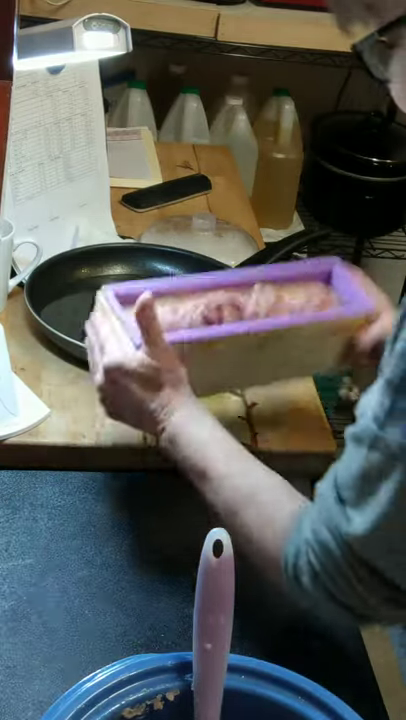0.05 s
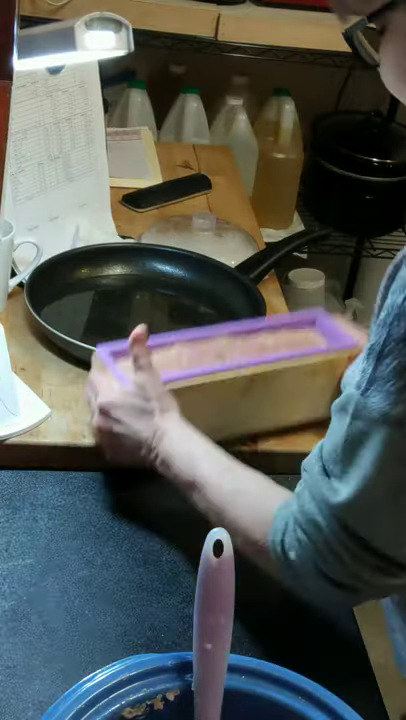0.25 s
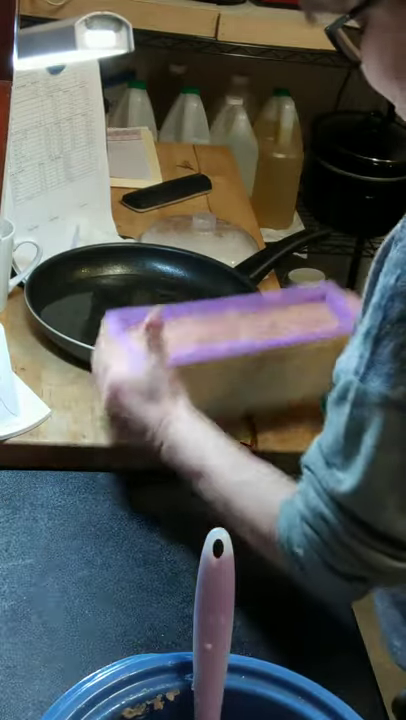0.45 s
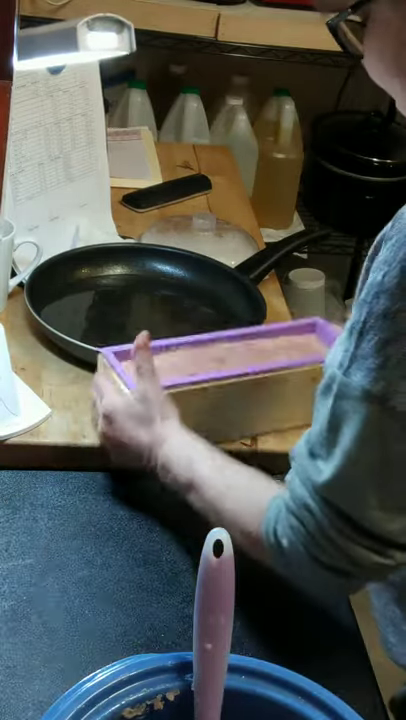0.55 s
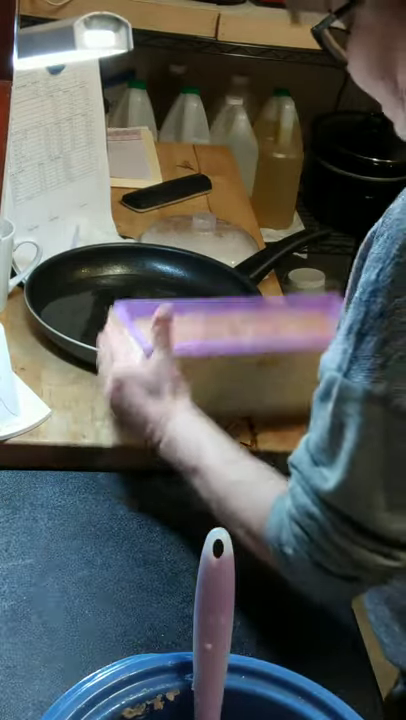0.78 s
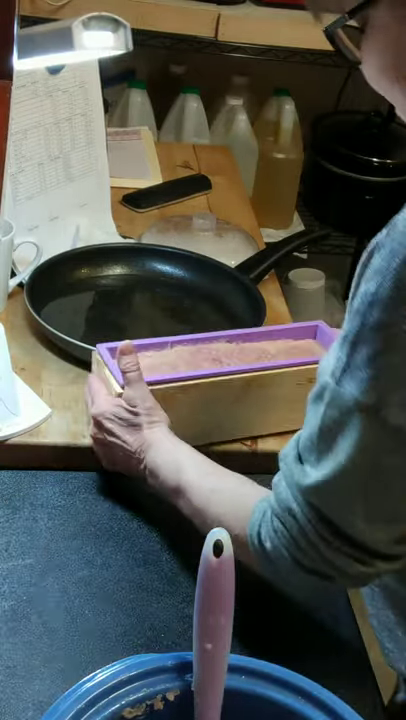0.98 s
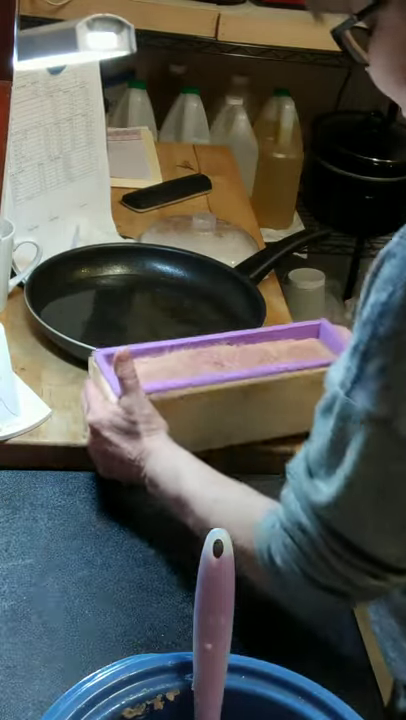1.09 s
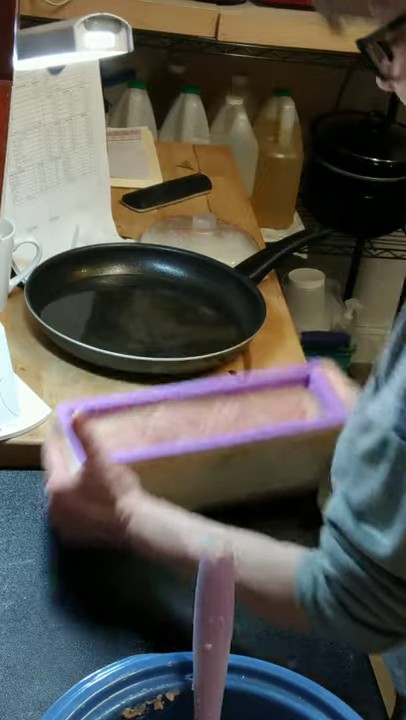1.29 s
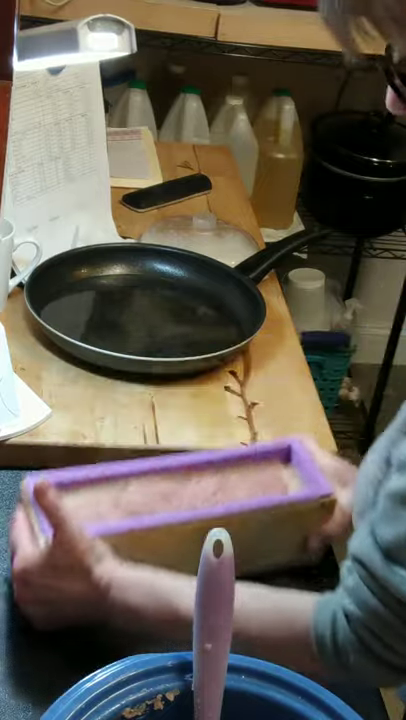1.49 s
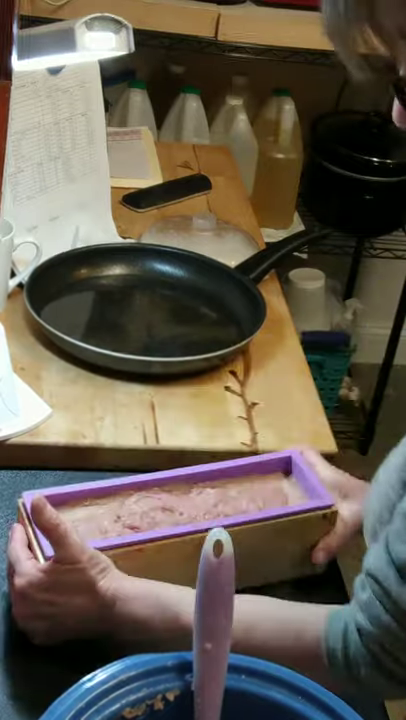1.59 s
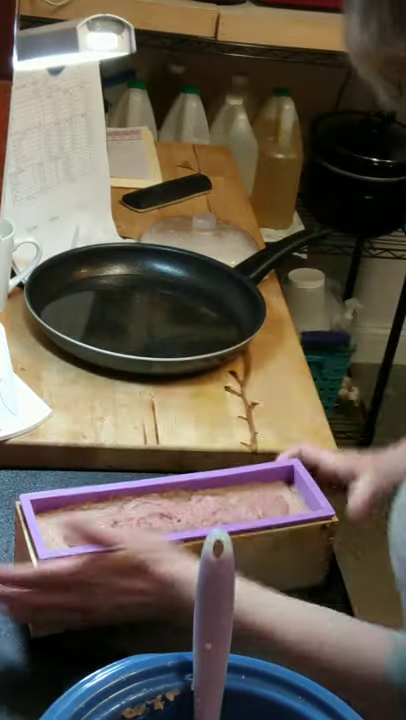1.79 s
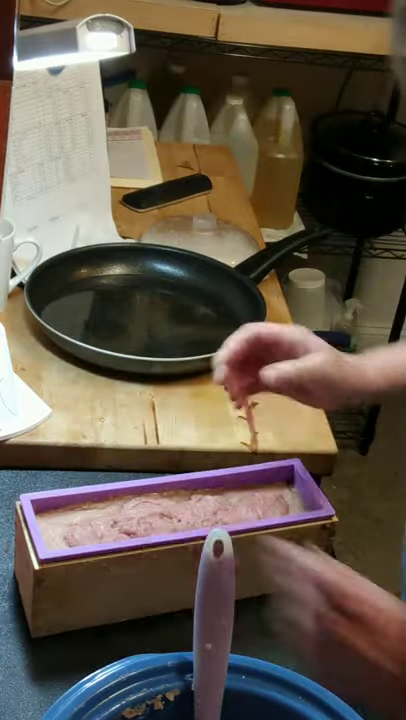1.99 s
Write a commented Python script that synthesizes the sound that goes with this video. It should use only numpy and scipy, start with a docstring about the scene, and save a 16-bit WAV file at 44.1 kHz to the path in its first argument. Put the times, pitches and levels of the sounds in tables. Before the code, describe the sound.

Heavy wooden loaf mold, damped by batter, bangs on a wooden table at about 0.25, 0.6 and 0.93 s. The first is strongest; each is a tight cluster of cracks and hollow knocks with low boom, short room tail and faint pan rattle. Around 1.62-1.8 s it lands softly on a counter with dull thuds and scuffs, then tiny release clicks near 1.87 s. Quiet hum and hiss throughout.

```python
"""Loaf mold banged on a table

In a small room, over a quiet hum and hiss, a wooden loaf mold full of batter is banged three times on a wooden
table, one edge first, then the rest of its base: decaying modes for box, board and table top, noise for cracks.
Low noise makes the table sway and boom; a pan on it hops and rings; a treble sizzle lingers after the blows.
The mold is then set down softly on a counter, with thuds, scuffs and clicks, and let go.
One microphone takes it all, the same in both channels."""
import sys
import numpy as np
from scipy import signal
from scipy.fft import rfft, irfft, next_fast_len
from scipy.io import wavfile
from scipy.ndimage import uniform_filter1d

SR = 44100
rng = np.random.default_rng(int(sys.argv[2]) if len(sys.argv) > 2 else 0)


def to_linear_factor(level_db):
    """Convert decibel levels (scalar or array-like) to linear amplitude factors."""
    exponent = np.asarray(level_db, float) / 20
    return 10 ** exponent


def generate_wav(sig):
    """Save sig (samples, or channels by samples) to the path in sys.argv[1] as 16-bit PCM at SR."""
    pcm = np.round(np.clip(np.atleast_2d(sig).T, -1, 1) * 32767).astype(np.int16)
    wavfile.write(sys.argv[1], SR, pcm)


N = 90404  # samples
KNOCK_RISE_S, THUD_RISE_S, PAN_RISE_S = 0.00037, 0.001, 0.00067
SWAY_RISE_S, SCUFF_RISE_S, LANDING_RISE_S = 0.03, 0.004, 0.003
WOOD_BLUR_HZ, PAN_BLUR_HZ, CLICK_BLUR_HZ = 24, 150, 200  # line widths from drifting phase


def unit(x):
    """Scales a signal to an rms of one."""
    return x / np.sqrt(np.mean(x ** 2) + 1e-20)


def along(points, hz):
    """Reads a curve of (Hz, value) points on a log frequency axis."""
    point_hz, value = np.transpose(points)
    return np.interp(np.log(hz + 1), np.log(point_hz + 1), value)


def filtered(x, response):
    """Multiplies the spectrum of x by a response of frequency."""
    size = next_fast_len(len(x) + 8192)
    hz = np.fft.rfftfreq(size, 1 / SR)
    return irfft(rfft(x, size) * response(hz), size)[:len(x)]


def add(track, start_s, sound):
    """Mixes a sound into the track at a time."""
    part = track[round(start_s * SR):][:len(sound)]
    part += sound[:len(part)]


def fade(t60, rise):
    """One second of quick rise and exponential decay, both in seconds."""
    t = np.arange(SR) / SR
    return to_linear_factor(-60 * t / t60) * (1 - np.exp(-t / rise))


def ring(modes, db, rise, scatter_db=2.5, blur_hz=0, tilt_db=0):
    """One blow on a set of decaying modes, their levels scattered and their phases drifting at random."""
    t, out = np.arange(SR) / SR, 0
    pivot_hz = modes[len(modes) // 3][0]
    for hz, level_db, t60 in modes:
        drift = np.cumsum(rng.standard_normal(SR)) * np.sqrt(2 * np.pi * blur_hz / SR)
        drift = uniform_filter1d(drift, size=128)
        gain_db = db + level_db + tilt_db * np.log2(hz / pivot_hz)
        gain_db += scatter_db * rng.standard_normal()
        wave = np.sin(2 * np.pi * hz * t + drift - drift[0])
        out = out + to_linear_factor(gain_db) * fade(t60, rise) * wave
    return out


def puff(spectrum, db, t60, rise, tilt_db=0):
    """A decaying burst of coloured noise, tilted about 2 kHz."""
    def colour(hz):
        return to_linear_factor(along(spectrum, hz) + tilt_db * np.log2((hz + 1) / 2000))
    noise = unit(filtered(rng.standard_normal(SR), colour))
    return to_linear_factor(db) * fade(t60, rise) * noise


# hum and hiss of the place at the microphone: pitch_hz [Hz], level_db [dB per Hz, relative]
AIR = [(15, -53), (25, -1.5), (64, 2), (242, -15.5), (309, -15), (463, -15), (607, -17.5), (887, -21.5),
       (1230, -21.5), (4140, -25.5), (16000, -37)]


def air():
    """Steady coloured noise makes hum and hiss; short treble modes make a faint regular tick."""
    out = to_linear_factor(-65) * unit(filtered(rng.standard_normal(N), lambda hz: to_linear_factor(along(AIR, hz))))
    tick_modes = [(8120, 0, .006), (6800, -5, .004), (5200, -3, .005)]  # pitch_hz, level_db, t60_s
    for start_s in np.arange(0.0105, N / SR, 0.04):
        add(out, start_s, ring(tick_modes, -60, KNOCK_RISE_S, blur_hz=CLICK_BLUR_HZ))
    return out


# contacts of the mold on the table: start_s [s], knock_db of the box [dB, relative],
# knock_tilt_db [dB per octave], thud_db of the table top [dB, relative],
# crack_db [dB], crack_tilt_db [dB per octave], crack_t60_s [s]
BANGS = [(0.2465, -19.5, -3.5, -16.5, -15.5, -3, 0.073), (0.2503, -15, 3, -13, -12.5, -0.5, 0.011),
         (.257, -17.5, -10.5, -8, -35, -4.5, 0.024), (0.5977, -10, -1.5, -20, -16, -4.9, 0.017),
         (.601, -24.5, 1.5, -13, -21, -4, 0.024), (.612, -10.5, -5.5, -43, -21, -3, 0.033),
         (0.6191, -24.5, -6.5, -12, -30, -5, 0.05), (0.9259, -13, -5, -14, -19, -2, 0.038),
         (.937, -15.5, 2.5, -24, -18, 0.5, 0.047), (0.9404, -11, 2.5, -23, -15, -7, 0.024),
         (0.951, -18, 1.5, -31, -22.5, -2.5, 0.014)]
# modes of the mold: pitch_hz [Hz], level_db [dB, relative], t60_s [s]
BOX = [(586, -6.5, 0.092), (697, -10.5, 0.12), (770, -13.5, .03), (1007, -0.5, 0.039), (1166, 0.5, 0.052),
       (1322.4, -8, 0.077), (1525.6, -3, 0.041), (1770, -13, 0.055), (2000, -13, 0.088), (2374, -15, 0.043),
       (2730, -13.5, 0.03), (3020, -17, 0.027)]
# modes of the table top: pitch_hz [Hz], level_db [dB, relative], t60_s [s]
TOP = [(131, -15.5, .1), (178.7, -5, 0.11), (237.2, 2.5, 0.087), (288.6, -4.5, 0.059), (394, -5, .1),
       (408, -12.5, 0.24)]
# noise of wood meeting wood: pitch_hz [Hz], level_db [dB per Hz, relative]
CRACK = [(100, -20), (600, -2), (1200, 0), (2000, -4), (3500, -11), (6000, -16), (8500, -14), (10000, -24),
         (11500, -44), (16000, -58)]


def bangs():
    """Each contact rings the modes of box and table top and cracks in a burst of noise."""
    out = np.zeros(N)
    for start_s, knock_db, knock_tilt_db, thud_db, crack_db, crack_tilt_db, crack_t60_s in BANGS:
        knock = ring(BOX, knock_db - 9.5, KNOCK_RISE_S, blur_hz=WOOD_BLUR_HZ, tilt_db=knock_tilt_db)
        thud = ring(TOP, thud_db - 10.0, THUD_RISE_S, blur_hz=WOOD_BLUR_HZ / 2)
        crack = puff(CRACK, crack_db, crack_t60_s, KNOCK_RISE_S, crack_tilt_db)
        add(out, start_s, crack - knock - thud)
    return out


# some contacts also give a knock of the base board: start_s [s], level_db [dB], pitch_hz [Hz]
RAPS = [(0.2504, -7, 1057), (.6004, -10.5, 1060), (0.6131, -17.5, 1370), (0.926, -14.5, 1070),
        (.9368, -20.5, 2687), (0.94, -7, 1200)]


def raps():
    """Short pitched knocks of the base board, held damped by the batter."""
    out = np.zeros(N)
    for start_s, level_db, pitch_hz in RAPS:
        add(out, start_s, -ring([(pitch_hz, 0, 0.018)], level_db, KNOCK_RISE_S, scatter_db=1))
    return out


# the pan on the table is jolted by the blows and lands again:
# start_s [s], low_db of the low ring [dB], high_db of the high ring [dB]
HOPS = [(0.251, -53.5, -65), (.41, -73.5, -62.5), (.60, -54.5, -77), (.688, -76, -56.5),
        (0.776, -79.5, -67), (0.935, -78.5, -66.5), (1.015, -57.5, -57)]
# low modes of the pan: pitch_hz [Hz], level_db [dB, relative], t60_s [s]
PAN_LOW = [(806, -2.5, 0.93), (1240, -2, 0.31), (1798, -4, 1)]
# high modes of the pan: pitch_hz [Hz], level_db [dB, relative], t60_s [s]
PAN_HIGH = [(3080, 2, 0.14), (4480, -4, 0.14), (4927, -5, 0.25), (6928, -8.5, 0.078)]
# the thinnest ring of the pan: pitch_hz [Hz], level_db [dB, relative], t60_s [s]
PAN_THIN = [(11780, -25, .18)]


def pan():
    """Thin metal rings in decaying modes after every jolt; wide phase drift makes the high ones chatter."""
    out = np.zeros(N)
    for start_s, low_db, high_db in HOPS:
        low = ring(PAN_LOW, low_db, PAN_RISE_S, blur_hz=5.3)
        high = ring(PAN_HIGH, high_db, PAN_RISE_S, blur_hz=PAN_BLUR_HZ)
        thin = ring(PAN_THIN, high_db, PAN_RISE_S)
        add(out, start_s, low + high + thin)
    return out


# decay of the small room: pitch_hz [Hz], t60_s [s]
ROOM = [(60, 0.25), (250, 0.31), (700, 0.29), (2000, 0.27), (5000, 0.26), (9000, 0.18), (12000, 0.1)]


def room(x):
    """Each frequency dies at its own speed; every short slice of sound meets a fresh noise tail."""
    out, step = np.zeros(N), SR // 80
    window = signal.get_window("hann", 2 * step)
    for start in range(0, N - 2 * step, step):
        piece = x[start:start + 2 * step] * window
        if np.abs(piece).max() > 1e-4:  # skip near silence
            hz, t, bins = signal.stft(rng.standard_normal(SR // 2), SR, nperseg=256)
            decay = to_linear_factor(-60 * t / along(ROOM, hz)[:, None])
            tail = signal.istft(bins * decay, SR, nperseg=256)[1]
            answer = signal.fftconvolve(piece, tail / np.linalg.norm(tail))
            add(out, start / SR + 0.0049, answer)  # delay in s
    return out


# the table frame sways after each blow, and faintly at the set-down:
# start_s [s], level_db [dB], t60_s [s]
SWAYS = [(.26, -26.5, 0.53), (0.629, -35.5, 0.8), (.95, -33.5, 0.81), (1.63, -37.5, 0.63)]
# low boom of the frame: pitch_hz [Hz], level_db [dB per Hz, relative]
FRAME = [(25, -41), (38, -11), (51, 3), (72, -2), (100, -5.5), (160, -12.5), (250, -15), (400, -32.5),
         (900, -71)]


def sway():
    """Low noise swells after the blow and decays as a wavering boom."""
    out = np.zeros(N)
    for start_s, level_db, t60_s in SWAYS:
        add(out, start_s, puff(FRAME, level_db, t60_s, SWAY_RISE_S))
    return out


# treble sizzle lingering after the blows: start_s of the hold [s], level_db [dB], hold_s [s]
SIZZLES = [(0.314, -70, 0.16), (0.655, -75.5, 0.14), (0.983, -75, 0.11)]
# colour of the sizzle: pitch_hz [Hz], level_db [dB per Hz, relative]
SIZZLE = [(5000, -26), (7500, -3.5), (8300, 5.5), (9000, -8), (11000, -36.5)]


def sizzle():
    """Narrow treble noise swells, holds and stops."""
    t, edge_s = np.arange(N) / SR, 0.02
    level = np.zeros(N)
    for start_s, level_db, hold_s in SIZZLES:
        end_s = start_s + hold_s
        level += to_linear_factor(level_db) * np.interp(t, [start_s - edge_s, start_s, end_s, end_s + edge_s], [0, 1, 1, 0])
    return level * unit(filtered(rng.standard_normal(N), lambda hz: to_linear_factor(along(SIZZLE, hz))))


# scuffs of the base and fingers: start_s [s], level_db [dB], t60_s [s], tilt_db [dB per octave]
SCUFFS = [(1.617, -51, .1, -3.5), (1.632, -31.5, 0.06, 0.5), (1.645, -44.5, 0.2, -5.5),
          (1.722, -46.5, 0.081, -4), (1.737, -54, 0.038, -3), (1.808, -67, 0.22, 2.5),
          (1.846, -57.5, 0.066, 3.5), (1.87, -58, 0.099, 1.5), (.817, -62.5, 0.24, 2.5)]
# colour of a scuff: pitch_hz [Hz], level_db [dB per Hz, relative]
SCUFF = [(150, -34), (500, 12), (1500, 1), (3600, -1.5), (5000, -1), (6500, -10.5), (8300, -6.5),
         (10500, -28), (16000, -40)]


def scuffs():
    """Rubbing of base and fingers, each a soft-edged burst of coloured noise."""
    out = np.zeros(N)
    for start_s, level_db, t60_s, tilt_db in SCUFFS:
        add(out, start_s, puff(SCUFF, level_db, t60_s, SCUFF_RISE_S, tilt_db))
    return out


# small clicks, most of them as the fingers let go: start_s [s], level_db [dB], pitch_hz [Hz]
CLICKS = [(0.817, -58, 2490), (0.881, -62, 5900), (1.851, -58, 2188), (1.874, -55.5, 2235),
          (1.874, -68, 4050), (1.875, -56, 5840), (1.954, -65, 4620)]


def clicks():
    """Small clicks, each one short mode blurred by fast phase drift."""
    out = np.zeros(N)
    for start_s, level_db, pitch_hz in CLICKS:
        add(out, start_s, ring([(pitch_hz, 0, 0.048)], level_db, KNOCK_RISE_S, blur_hz=CLICK_BLUR_HZ))
    return out


# soft contacts on the counter: start_s [s], level_db [dB, relative], tilt_db [dB per octave]
LANDINGS = [(1.618, -31.5, 3), (1.634, -33, 1), (1.647, -27.5, 0.5), (1.69, -35, -2.5), (1.724, -35, -3),
            (1.788, -56, 0)]
# modes of the counter: pitch_hz [Hz], level_db [dB, relative], t60_s [s]
COUNTER = [(69.3, -3, 0.19), (104.4, -1, 0.2), (160, 5.5, 0.034), (229, 8, 0.064), (310, -15, 0.043),
           (366, -16, 0.17), (542, -10.5, 0.033), (808, -17, 0.072)]


def landings():
    """Soft contacts ring the counter's low modes as dull thuds."""
    out = np.zeros(N)
    for start_s, level_db, tilt_db in LANDINGS:
        add(out, start_s, -ring(COUNTER, level_db, LANDING_RISE_S, blur_hz=3.7, tilt_db=tilt_db))
    return out


def scene():
    """Table and counter sounds excite the room; all layers reach both channels alike."""
    table = bangs() + raps()
    counter = scuffs() + clicks() + landings()
    wet = room(to_linear_factor(-9) * table + to_linear_factor(-11) * counter)
    mix = table + counter + wet + sway() + pan() + sizzle() + air()
    return np.tile(mix, (2, 1))


def roll_off(x):
    """The treble ends steeply here."""
    return signal.sosfilt(signal.butter(12, 16170, fs=SR, output="sos"), x)


def record(dry):
    """The microphone channels get a second-order bass roll-off at 32 Hz and a band limit at 15950 Hz."""
    def band(hz):
        return (hz < 15950) * (1j * hz / (32 + 1j * hz)) ** 2
    mix = np.array([filtered(channel, band) for channel in dry])
    return roll_off(mix)


dry = scene()
out = record(dry)
generate_wav(out)
```